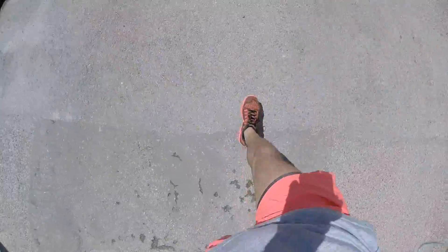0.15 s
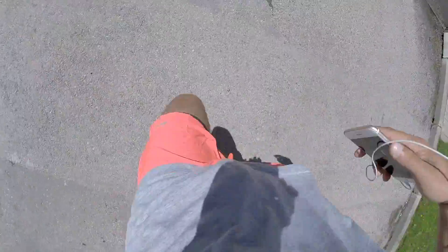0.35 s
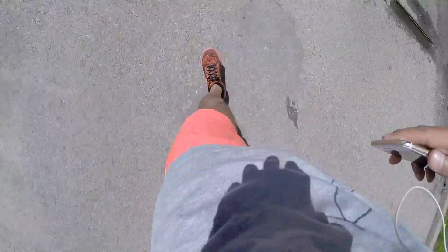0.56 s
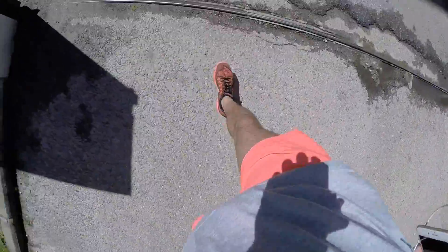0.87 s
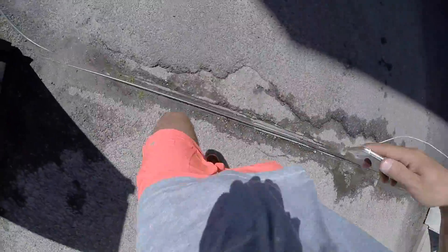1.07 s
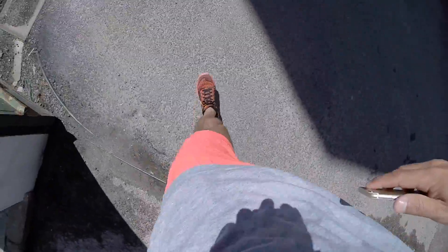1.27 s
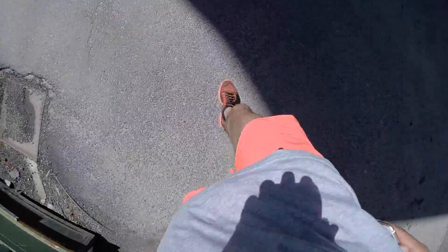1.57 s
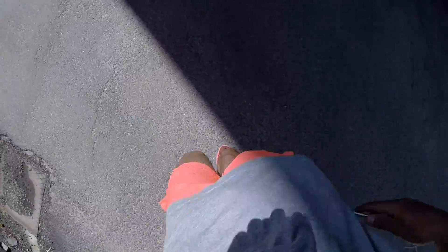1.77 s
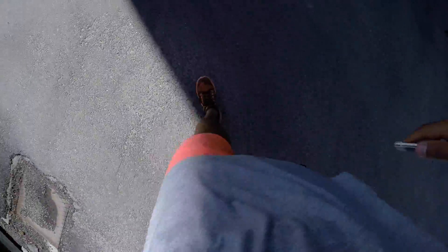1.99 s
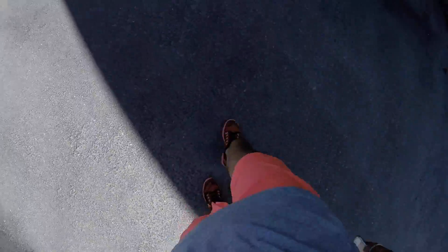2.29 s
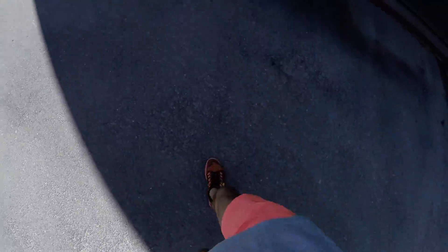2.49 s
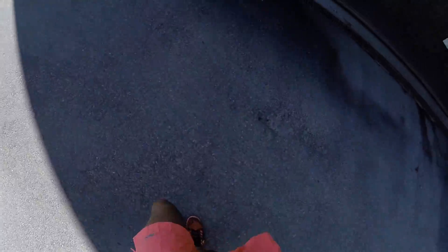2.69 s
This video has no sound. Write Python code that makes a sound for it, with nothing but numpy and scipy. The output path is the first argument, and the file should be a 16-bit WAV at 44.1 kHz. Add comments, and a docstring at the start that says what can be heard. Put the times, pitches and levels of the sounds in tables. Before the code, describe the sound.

Running footsteps on asphalt, heard close from a chest-worn microphone: seven strides from about 0.3 seconds, roughly every 0.37 seconds, each a small heel tick, gritty scrape and short slap with faint cloth swish. Low wind roars, flutters and thumps over them from 0.15 until 2 seconds, then falls away. The last steps, near 2.1 and 2.5, sound clear over faint outdoor hush with a slight short echo.

```python
"""A runner on asphalt, close below a chest-worn microphone: seven strides, each a heel tick, gritty roll and slap.
Footfalls are decaying bursts of coloured noise and crushed grains, with short ringing snaps of grit around them.
Clothes swish as shaped noise; the ground and nearby walls return a short diffuse echo of the feet.
For two seconds gusts roar and thump at the microphone, as noise swept past at the air speed and single pressure peaks.
Then they drop, leaving the steps, the cloth and a faint, distant outdoor hush."""
import sys
import numpy as np
from scipy import signal
from scipy.fft import rfft, irfft, next_fast_len
from scipy.io import wavfile
from scipy.ndimage import uniform_filter1d, map_coordinates

SR = 44100
rng = np.random.default_rng(int(sys.argv[2]) if len(sys.argv) > 2 else 0)


def transcribe(signal):
    """Save signal, clipped to [-1, 1], as a 16-bit WAV file at the path in sys.argv[1]."""
    frames = np.atleast_2d(signal).T
    limited = np.clip(frames, -1, 1)
    pcm = np.round(limited * 32767).astype(np.int16)
    wavfile.write(sys.argv[1], SR, pcm)


N = 125685  # samples

# Distant outdoor hush, spectrum: [f/Hz, relative level/dB]
HUSH_COLOUR = [(60, 12.5), (200, -6.5), (500, 2), (900, 3), (1300, -7), (1900, -12), (2600, -16.5),
               (3600, -15.5), (4600, -18), (5500, -25), (6500, -23.5), (10000, -30.5), (13000, -41),
               (15000, -46)]
HUSH_DB, HUSH_WAVER_DB = -51, 0.4
HUSH_WAVER_KNOTS_PER_S = 5

# Wind at the microphone: [t/s, level before WIND_TRIM_DB/dB, air speed/full gust]
GUSTS = [(0.0, -47, 0.51), (0.115, -26.5, 0.58), (0.135, -22.5, 0.39), (0.168, -18.5, 0.57),
         (0.185, -8, 0.79), (0.22, -13.5, 1.36), (0.25, -11.5, 0.78), (0.295, -14.5, 0.93),
         (0.32, -12, 0.76), (0.338, -17, 0.6), (0.385, -17, 0.8), (0.465, -22.5, 0.53), (0.505, -24, 0.35),
         (0.545, -23, 0.35), (0.57, -17.2, 0.46), (0.625, -20.5, 0.58), (0.648, -34, 0.45),
         (0.705, -44.5, 0.55), (0.745, -19, 0.68), (0.815, -30, 0.57), (0.835, -17.3, 0.33),
         (0.865, -11.5, 0.57), (0.885, -8.5, 0.98), (0.925, -11, 0.64), (0.965, -13, 1.03),
         (1.08, -12.6, 0.62), (1.095, -18.0, 0.73), (1.115, -13.5, 0.75), (1.165, -16, 0.86),
         (1.195, -8, 1.145), (1.215, -14, 0.83), (1.275, -15, 0.93), (1.355, -15.5, 1.14),
         (1.415, -11.5, 0.63), (1.46, -14, 0.64), (1.48, -34, 0.68), (1.5, -19, 0.42), (1.53, -23.5, 0.67),
         (1.55, -18.5, 0.43), (1.57, -16.5, 0.84), (1.7, -12.5, 1.29), (1.745, -19.5, 0.78),
         (1.775, -25.5, 0.56), (1.8, -24.5, 0.69), (1.81, -37, 0.39), (1.84, -18.5, 0.32),
         (1.88, -15.5, 0.37), (1.895, -32, 0.3), (1.925, -24, 0.31), (1.95, -19.5, 0.75),
         (2.015, -32.1, 0.27), (2.035, -51, 0.44), (2.08, -68, 0.36), (2.17, -45.6, 0.34),
         (2.21, -36.5, 0.36), (2.32, -48, 0.3), (2.44, -74, 0.36), (2.53, -40, 0.35), (2.62, -77, 0.38),
         (2.8, -68, 0.4)]
# Slow pressure swell under the gusts: [t/s, level before RUMBLE_TRIM_DB/dB]
RUMBLE = [(0.0, -25), (0.1, -27), (0.15, -14), (0.36, -21), (0.42, -34), (0.58, -29.5), (0.61, -16),
          (0.67, -30), (0.72, -19.5), (0.85, -28.5), (0.96, -16), (1.19, -19.5), (1.25, -26.5), (1.39, -17),
          (1.55, -30), (1.59, -15), (1.72, -39.5), (1.75, -12.5), (1.82, -34.5), (1.85, -18.5), (1.93, -29),
          (1.95, -20), (2.06, -39), (2.54, -33.5), (2.59, -42), (2.85, -46)]
# Eddies in a full gust, spectrum: [f/Hz, relative level/dB]
EDDY_COLOUR = [(40, -7.5), (100, -2), (170, 1.5), (330, -3.5), (520, -9.5), (750, -18.5), (1100, -27),
               (1700, -39.5), (2800, -61.5), (6000, -92), (12000, -84.5)]
# Slow swell, spectrum: [f/Hz, relative level/dB]
RUMBLE_COLOUR = [(12, -22), (25, -1.5), (45, 3), (85, -0.5), (140, -10.5), (280, -21), (600, -40),
                 (2000, -83)]
WIND_TRIM_DB, RUMBLE_TRIM_DB = 0.5, -0.5
EDDY_LOW_HZ = 88  # the slow swell takes over below this
FLUTTER_KNOTS_PER_S, FLUTTER_LIMIT = 260, 1.6
FLUTTER_DB, FLUTTER_OCTAVES = 2.2, 0.24  # level and speed change per unit of flutter

# Single eddies thumping the microphone: [t/s, peak level/dB, width scale/ms]
BUFFETS = [(0.182, -1, 1.13), (.199, -11.5, .4), (.218, -6, .5), (.262, -7, 0.68), (.453, -6.5, 0.88),
           (.572, -11, 1.07), (.611, -11, 1.07), (.742, -16, 0.84), (.768, -16, .8), (.903, -6, 0.95),
           (.966, -7, .5), (1.134, -12.5, 0.47), (1.150, -6, 0.34), (1.181, -5, 1.29), (1.194, -10.5, 0.31),
           (1.424, -4.5, 0.32), (1.699, -6.5, .4), (1.751, -2.5, 1.316), (1.844, -10, 1.68),
           (1.957, -6.5, 0.44)]

# Strides: [heel down t/s, sole flat t/s, roll time/ms, heel level/dB, slap level/dB,
#           grit level/dB, swish level/dB]; levels scale the bursts before their envelopes
STEPS = [(0.286, 0.298, 8.4, -24, -40, -36, -51.5), (0.6465, .670, 5.5, -36, -20, -30, -47.5),
         (1.0047, 1.023, 8.7, -36.5, -24.5, -41.5, -55), (1.3747, 1.403, 10.42, -46, -23, -37.5, -53),
         (1.765, 1.776, 12.3, -40, -35.5, -45, -54.5), (2.114, 2.144, 6, -41, -21, -33.5, -45.5),
         (2.497, 2.529, 17.2, -45, -30.5, -58, -48.5)]
# Sole slap, spectrum: [f/Hz, relative level/dB]
SLAP_COLOUR = [(100, -16.5), (240, 3.5), (430, -4), (720, 7.5), (880, -1.5), (1120, 1.5), (1400, -8),
               (1700, -3), (1950, -13), (2400, -7), (3000, -14), (4200, -35), (7000, -48.5), (15000, -48.5)]
# Grit under the sole, spectrum: [f/Hz, relative level/dB]
GRIT_COLOUR = [(300, -10), (1000, 14), (2000, 7.5), (3000, 8), (4300, 0.5), (5600, -1), (7200, -14),
               (10500, -16.5), (12000, -24), (15000, -26.5)]
HEEL_S, SLAP_S, GRIT_S = 0.0023, 0.0031, 0.0025  # decay times: heel tick, slap, grit settling
HEEL_KNOCK_DB = -6.5  # body of the sole within the heel tick
GRAINS_PER_S, GRAIN_SPREAD_DB = 2000, 4

# Lone snaps of grit and small rattles: [t/s, level/dB, f/Hz, width/octaves, decay time/ms]
CLICKS = [(.029, -39.5, 4060, 1.7, 1), (.063, -47.5, 6500, 3, 1.1), (.2852, -35, 3500, 1.06, 2.4),
          (.2935, -41, 4370, 1.3, 1.9), (.3015, -35, 2980, 0.83, 2), (0.306, -32, 2800, 0.77, 1),
          (0.314, -45.5, 7500, 1.7, 5.5), (.4255, -42.5, 4500, 1.4, 0.88), (.4425, -44, 4000, 0.93, 1.4),
          (.673, -21, 2780, 0.47, 1.4), (.687, -45.5, 4000, 2.6, 4.79), (1.012, -31.5, 3200, 0.64, 1.2),
          (1.0234, -38.5, 2971, 1.25, 1.8), (1.033, -46, 3216, 0.79, 2.2), (1.05, -45.5, 3495, 1, 2),
          (1.183, -39, 4960, 1.22, 1), (1.239, -36, 2699, 0.48, 1.7), (1.271, -36.5, 3840, 0.73, 1.1),
          (1.391, -41.5, 4372, 0.85, 1.2), (1.399, -35.5, 3609, 1.18, 0.71),
          (1.7675, -43, 4530, 0.91, 1.01), (1.772, -51, 8490, .6, 1.033), (1.777, -32.5, 3300, 0.76, 0.97),
          (1.793, -41.5, 5471, 1.106, 1.1), (1.797, -50, 5160, 1, 1), (2.1319, -35, 1088, 0.67, 1.4),
          (2.1465, -30, 3500, 0.91, 1.05), (2.369, -50, 3030, 1.59, 2), (2.509, -24.5, 3000, 0.49, 1.34),
          (2.5174, -40, 2600, 1.17, 0.92), (2.5215, -28.5, 2395, 1.06, 1.07), (2.5285, -39, 2706, 1, 1.5)]
CLICK_RISE_S, CLICK_CRACK_DB = 0.000067, -26.5

# Cloth and shoe swish, spectrum: [f/Hz, relative level/dB]
SWISH_COLOUR = [(300, 0.5), (1100, 9.5), (1900, 0.5), (2500, -0.5), (3600, -3), (4700, -1.5), (6500, -12),
                (10000, -15.5), (13000, -21), (15500, -27)]
# Legs brushing past each other: [t/s, level/dB, half length/s]
BRUSHES = [(.04, -46, 0.046), (.15, -51.5, 0.05), (.775, -52.5, 0.019), (.87, -62, 0.07), (1.12, -62, .03),
           (2.58, -79, 0.013)]
SWISH_RISE_S, SWISH_FALL_S, SWISH_FLICKER_DB = 0.023, 0.18, 1.8

YARD_DB, YARD_T60_S, YARD_DELAY_S = -18, 0.26, 0.016
TOP_HZ = 15200  # upper limit of the recorder


def undb(db):
    """Turn decibels into gain."""
    return 10 ** (np.asarray(db) / 20)


def unit(x):
    """Scale to an rms of one."""
    return x / np.sqrt(np.mean(x ** 2))


def curve(rows, t, axis=1):
    """Join one column of (t/s, value, ..) rows by straight lines."""
    rows = np.array(rows)
    return np.interp(t, rows[:, 0], rows[:, axis])


def colour(x, points):
    """Minimum-phase filter through (f/Hz, level/dB) points, output at rms one."""
    hz, db = np.array(points).T
    size = next_fast_len(len(x)) * 2
    f = np.maximum(np.fft.rfftfreq(size, 1 / SR), 1)
    gain = undb(np.interp(np.log(f), np.log(hz), db))
    # folding the cepstrum onto positive time makes the filter causal
    cepstrum = irfft(np.log(gain))
    cepstrum[1:size // 2] *= 2
    cepstrum[size // 2 + 1:] = 0
    response = np.exp(rfft(cepstrum))
    return unit(irfft(rfft(x, size) * response)[:len(x)])


def noise(points, size=N):
    """Coloured noise at rms one."""
    return colour(rng.standard_normal(size), points)


def walk(knots_per_s):
    """Smooth random curve through evenly timed knots, at rms one."""
    knots = rng.standard_normal(4096)
    place = np.arange(N) / SR * knots_per_s
    return unit(map_coordinates(knots, [place], mode="mirror"))


def steady(x, size):
    """Hold the level of a noise at one over a window of size samples."""
    return x / np.sqrt(uniform_filter1d(x ** 2, size) + 1e-9)


def burst(t, at, rise, fall):
    """Exponential swell up to a moment and decay after it."""
    before = np.maximum(at - t, 0)
    after = np.maximum(t - at, 0)
    return np.exp(-before / rise - after / fall)


def distant_hush():
    """Faint outdoor bed: coloured noise with a slow, slight waver."""
    return noise(HUSH_COLOUR) * undb(HUSH_DB + HUSH_WAVER_DB * walk(HUSH_WAVER_KNOTS_PER_S))


def wind(t):
    """Eddies sweep over the microphone: the faster they pass, the brighter they roar."""
    flutter = FLUTTER_LIMIT * np.tanh(walk(FLUTTER_KNOTS_PER_S) / FLUTTER_LIMIT)
    speed = curve(GUSTS, t, axis=2) * 2 ** (FLUTTER_OCTAVES * flutter)
    # reading a fixed eddy pattern at the air speed shifts its pitch
    pattern = steady(noise(EDDY_COLOUR, size=2 * N), size=900)
    eddies = map_coordinates(pattern, [np.cumsum(speed)], mode="mirror")
    highpass = signal.butter(2, EDDY_LOW_HZ, "high", fs=SR, output="sos")
    eddies = signal.sosfilt(highpass, eddies)
    fluttering = steady(eddies * undb(FLUTTER_DB * flutter), size=1300)
    roar = fluttering * undb(curve(GUSTS, t) + WIND_TRIM_DB)
    swell = steady(noise(RUMBLE_COLOUR), size=2500) * undb(curve(RUMBLE, t) + RUMBLE_TRIM_DB)
    return roar + swell


def buffets(t):
    """A tight eddy at the microphone gives one pressure peak between two shallow dips."""
    out = np.zeros(N)
    for at, db, width_ms in BUFFETS:
        u = (t - at) * 1000 / width_ms
        out += undb(db) * (1 - u ** 2 / 2) / (1 + u ** 2 / 4) ** 4
    return out


def yard_echo(x, t):
    """Short diffuse echo from the ground and nearby walls: a decaying noise tail."""
    tail = rng.standard_normal(N) * undb(-60 * t / YARD_T60_S) * (t > YARD_DELAY_S)
    tail /= np.linalg.norm(tail)
    return undb(YARD_DB) * signal.fftconvolve(x, tail)[:N]


def clothes(t):
    """Cloth rubs as flickering noise after every landing and when the legs pass."""
    level = np.zeros(N)
    for heel, *_, db in STEPS:
        age = np.maximum(t - heel, 0)
        level += undb(db) * (1 - np.exp(-age / SWISH_RISE_S)) * np.exp(-age / SWISH_FALL_S)
    for at, db, half in BRUSHES:
        level += undb(db) * np.exp(-((t - at) / half) ** 2)
    flicker = undb(SWISH_FLICKER_DB * walk(70))
    return level * noise(SWISH_COLOUR) * flicker


def grit():
    """Dense grains of uneven size crushed under the sole: random impulses, coloured."""
    hit = rng.random(N) < GRAINS_PER_S / SR
    grain_size = undb(GRAIN_SPREAD_DB * rng.standard_normal(N))
    grains = hit * rng.standard_normal(N) * grain_size
    return steady(colour(grains, GRIT_COLOUR), size=400)


def clicks(t):
    """Each snap is a short band of noise around its own pitch with a faint broad crack."""
    out, crack = np.zeros(N), grit()
    for at, db, hz, octaves, decay_ms in CLICKS:
        half = 2 ** (octaves / 2)
        edges = [hz / half, min(hz * half, TOP_HZ)]
        band = signal.butter(2, edges, "band", fs=SR)
        ring = steady(signal.lfilter(*band, rng.standard_normal(N)), size=100)
        envelope = burst(t, at, CLICK_RISE_S, decay_ms / 1000)
        out += undb(db) * envelope * (ring + undb(CLICK_CRACK_DB) * crack)
    return out


def steps(t):
    """The heel ticks, then the sole rolls down over grit and slaps flat."""
    crunch, sole = grit(), steady(noise(SLAP_COLOUR), size=300)
    out = np.zeros(N)
    for heel, flat, roll_ms, heel_db, slap_db, grit_db, _ in STEPS:
        roll = roll_ms / 1000
        # silent until contact, which fades in over the last 0.5 ms before heel down
        down = np.clip((t - heel) / 0.0005 + 1, 0, 1)
        tick = undb(heel_db) * burst(t, heel, HEEL_S, HEEL_S) * (crunch + undb(HEEL_KNOCK_DB) * sole)
        slap = undb(slap_db) * burst(t, flat, roll, SLAP_S) * sole
        crush = undb(grit_db) * burst(t, flat, roll, GRIT_S) * crunch
        out += down * (tick + slap + crush)
    return out


def scene():
    """Feet and clothes close below the microphone, wind on it, a distant hush behind."""
    t = np.arange(N) / SR
    background = distant_hush() + wind(t) + buffets(t)
    feet = steps(t) + clicks(t)
    return (background + clothes(t) + yard_echo(feet, t) + feet)[None]


def record(dry):
    """The recorder rounds off the highest peaks and cuts the top."""
    held = dry / (1 + (np.abs(dry) / 0.92) ** 6) ** (1 / 6)
    lowpass = signal.ellip(8, 0.2, 70, TOP_HZ, fs=SR, output="sos")
    return signal.sosfilt(lowpass, held)


dry = scene()
out = record(dry)
transcribe(out)
```